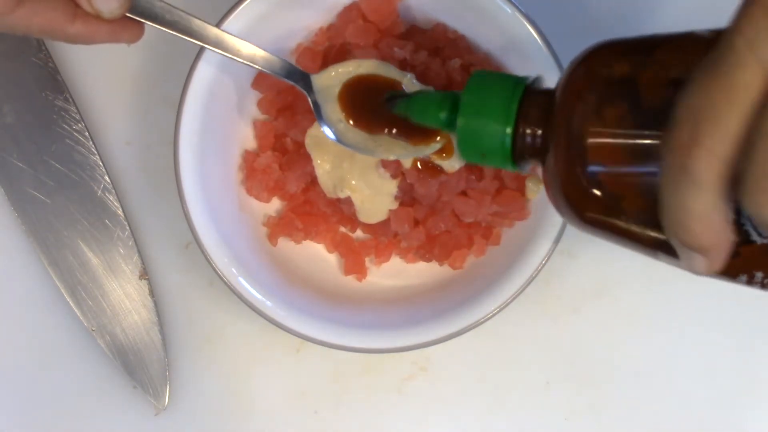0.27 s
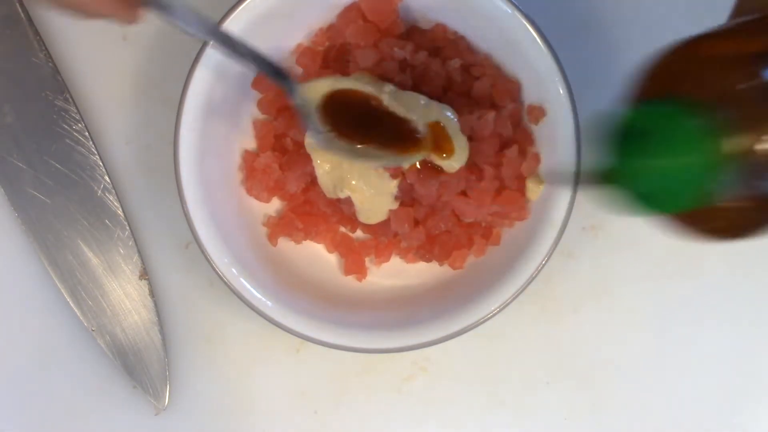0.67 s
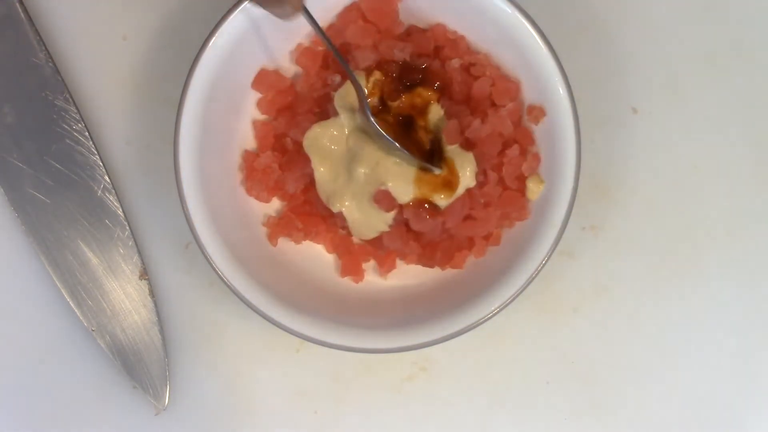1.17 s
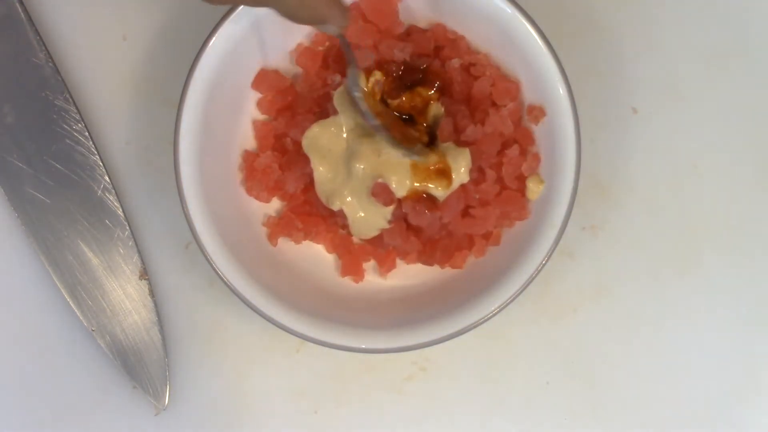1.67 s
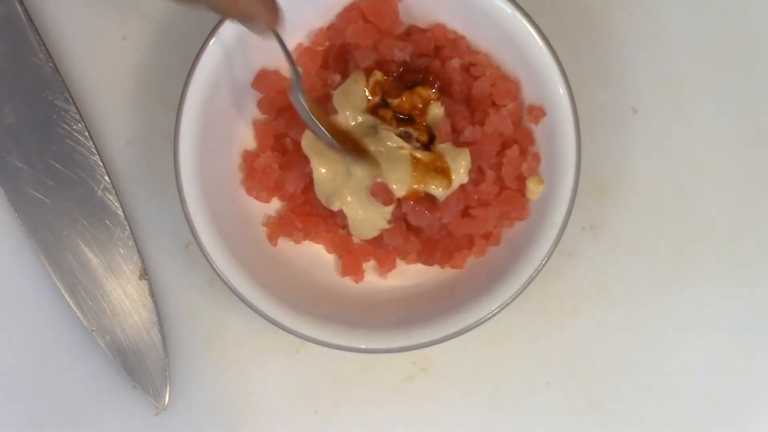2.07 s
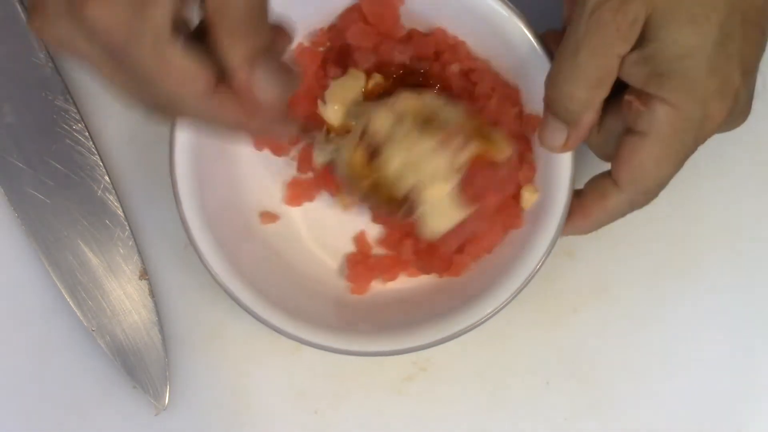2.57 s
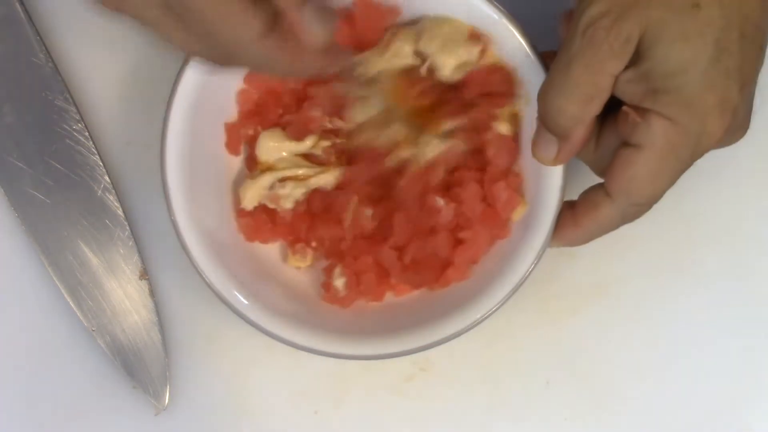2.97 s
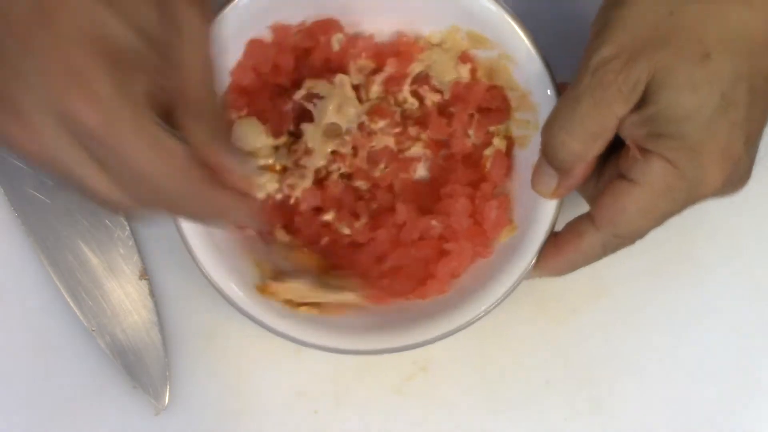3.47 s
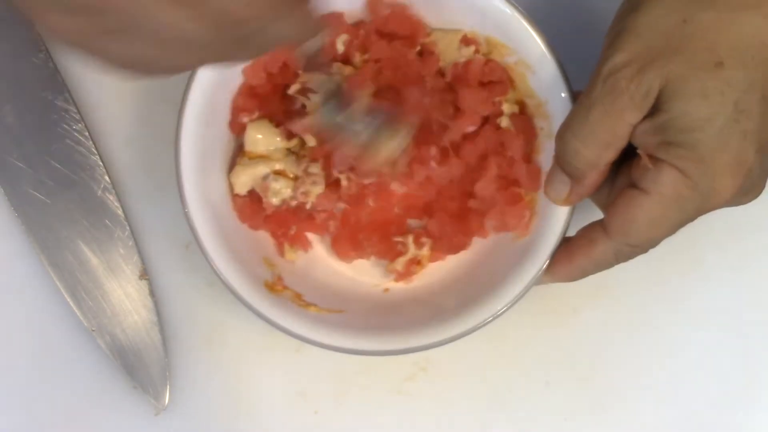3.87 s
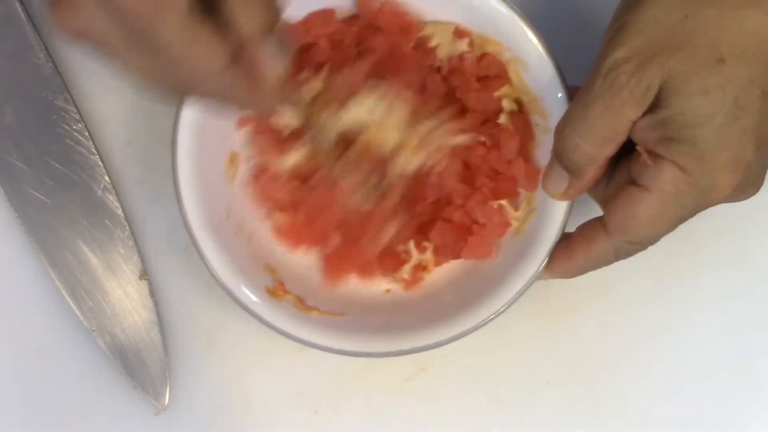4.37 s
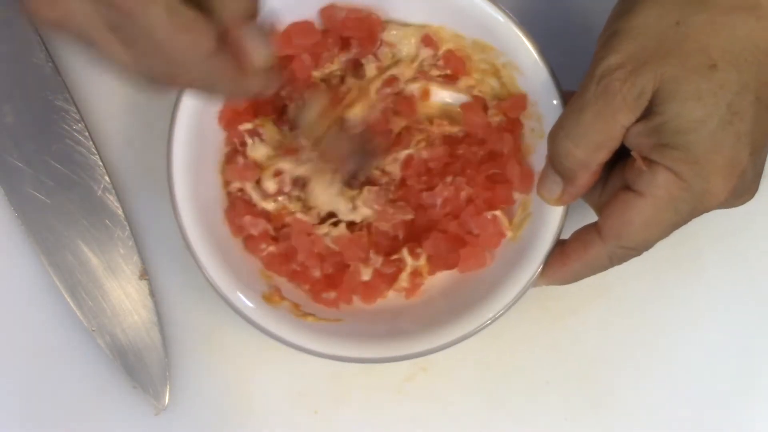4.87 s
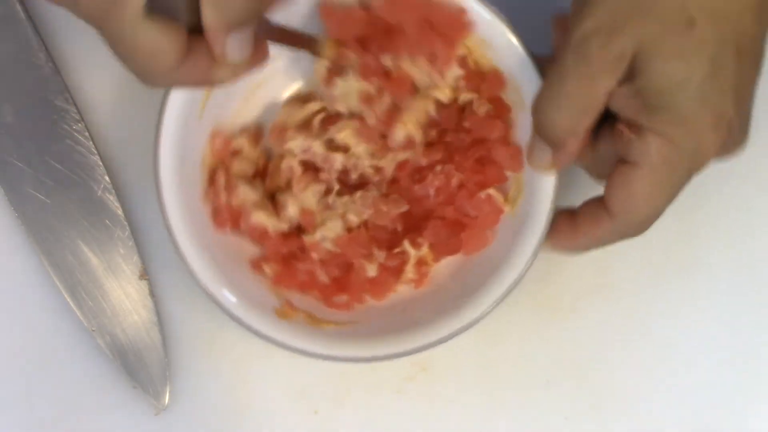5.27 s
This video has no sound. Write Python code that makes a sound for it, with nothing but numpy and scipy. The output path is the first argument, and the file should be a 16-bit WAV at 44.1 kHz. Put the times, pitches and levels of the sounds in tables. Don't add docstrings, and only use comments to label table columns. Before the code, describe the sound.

A steel spoon clinks sharply against a food-filled ceramic bowl in a hard-walled kitchen, with wet stirring, a few bumps and steady appliance hum.

```python
import sys
import numpy as np
from scipy import signal
from scipy.fft import rfft, irfft
from scipy.io import wavfile

SR = 44100
rng = np.random.default_rng(int(sys.argv[2]) if len(sys.argv) > 2 else 0)


def inscribe(sig):
    pcm = np.round(np.clip(np.atleast_2d(sig).T, -1, 1) * 32767)
    wavfile.write(sys.argv[1], SR, pcm.astype(np.int16))


def natural_amplitude(level_db):
    exponent = np.asarray(level_db, float) / 20
    return 10 ** exponent


N = 243873

# [f/Hz, level per Hz/dB]
AIR_NOISE = [(20, -39), (45, -35), (70, -28.5), (100, -25.5), (160, -10), (270, -7), (340, -6),
             (530, -11.5), (900, -18), (2000, -26.5), (3900, -30.5), (7500, -38.5), (11000, -41.5),
             (13500, -47), (16500, -50)]
# [f/Hz, rms level/dB]
MOTOR_TONES = [(247.6, -63.5), (296.1, -60.5), (333.8, -56.5), (436.0, -64.5), (597.5, -73)]
AIR_DB = -46.5
MAINS_HZ, MAINS_DB = 59.3, -72

# [t/s, peak level/dB,
# f/Hz]
SMACKS = [(0.9048, -42, 7520), (1.2805, -38.5, 6300), (2.8592, -32, 6160), (3.595, -29.5, 7900),
          (3.9164, -7, 7450), (3.9168, -12, 9300), (4.1723, -38, 10900), (4.193, -34, 6100),
          (4.2199, -41, 7340), (4.269, -36, 8760), (4.3137, -39, 10300), (4.4087, -34, 10400),
          (4.416, -37.5, 6850), (4.4545, -31, 8910), (4.5006, -26.5, 9700), (4.529, -30, 7160),
          (4.5704, -30, 10500), (4.66, -15, 7590), (4.7337, -27, 10500), (4.816, -31.5, 8140),
          (4.849, -29, 10200), (4.87, -28, 8250), (4.9234, -34, 7900), (4.951, -34, 8920),
          (5.0341, -22, 11100), (5.062, -25.5, 9900), (5.2514, -34.5, 9300), (5.284, -19.5, 8330),
          (5.4518, -32.5, 6860), (5.5152, -27.5, 7180)]
# [t/s, peak level/dB, f/Hz]
TICKS = [(0.1351, -37, 2960), (0.825, -36.5, 3300), (1.514, -42, 1830), (1.8123, -35, 2000),
         (1.8627, -31, 1810), (4.1958, -33, 2280), (4.2267, -34, 2080), (4.2697, -32, 3020),
         (4.424, -31, 3170), (4.4443, -33, 2400), (4.4565, -15, 2120), (4.4721, -28, 2360),
         (4.9485, -30, 3370), (4.999, -29, 1910), (5.1382, -27.5, 3430), (5.2564, -36, 3210),
         (5.2819, -27.5, 4520), (5.459, -37, 2750), (5.5039, -29, 2300)]
# [t/s, level/dB]
STIR_EFFORT = [
    (0, -110),
    (2.5, -74),
    (3.9, -74.5),
    (4.15, -60),
    (4.45, -59.5),
    (4.65, -73),
    (5.05, -58.5),
    (5.38, -78.5),
    (5.53, -58.5),
]
SMACK_CYCLES, TICK_CYCLES = 14, 10
SCRAPE_DB, SQUELCH_DB = 2.5, -2.5
BOWL_ECHO_S, BOWL_ECHO_DB = 0.00087, -7

# [t/s, peak level/dB]
BOTTLE_HITS = [
    (1.632, -21.5),
    (1.651, -28.5),
]
# [f/Hz, level/dB, t60/s]
BOTTLE_MODES = [(121.5, -5, 0.17), (480, -7, 0.07), (612, 0, 0.059), (1280, -8, 0.052), (1977, -0.5, .05)]
# [centre f/Hz, level/dB, half width/octaves, t60/s]
BOTTLE_RATTLE = [(3200, -5, .6, .06), (7000, -19, .7, .04), (560, -11, .6, 0.16)]
BOTTLE_PUSH_CYCLES = .4
# [t/s, peak level/dB, foot f/Hz, foot level/dB, push/ms]
THUDS = [
    (1.881, -23, 406, 14, 1.37),
    (2.222, -5, 456, 3.5, 3.08),
    (3.005, -10, 434, -4.5, 4.8),
]
# [f/Hz, level/dB, t60/s]
BOARD_MODES = [(105.5, -19.5, .2), (164, -25, 0.22), (256.5, -1.5, .1), (298.7, -5, 0.074)]
# [centre f/Hz, level/dB, half width/octaves, t60/s]
THUD_RATTLE = [(400, -8, 1.2, .13)]
FOOT_T60_S, SINK_PUSHES = 0.032, 2.2
# [t/s, peak level/dB]
JOLTS = [
    (2.2255, -3.5),
    (3.0116, -7.5),
]
# [centre f/Hz, level/dB, half width/octaves, t60/s]
JOLT_RATTLE = [(1500, -8, .6, .06), (3100, 1.5, .5, 0.024)]

# [t/s, body peak level/dB, bright edge peak level/dB, edge f/Hz, rim ring level/dB]
CRACKS = [(2.0614, 8, -2.5, 5470, -14.5), (2.3311, -9, -15, 8000, -20.5), (2.6066, -2.5, -27, 6070, -16.5),
          (2.8949, -4.5, -14.5, 6600, -18), (3.1174, 6, -14, 7000, -9.5), (3.392, -11, -18, 5000, -22),
          (3.6518, 5, -4.5, 6400, -13), (3.9168, -8, -10, 6500, -19), (4.661, -4.5, -30, 10000, -16),
          (5.035, -25, -31, 8450, -48), (5.0371, -22.5, -54, 8000, -47)]
BODY_HZ, BODY_OCTAVES, EDGE_OCTAVES = 2750, .62, .8
# [t/s, lower wall f/Hz, its peak level/dB, upper wall f/Hz, its peak level/dB]
CLINKS = [
    (2.0615, 2030, 5, 2950, -8),
    (2.3312, 2147, -5, 3260, -6),
    (2.6067, 2166, -0.5, 3730, -16),
    (2.895, 2250, 0.5, 3010, -4.5),
    (3.1178, 1933, -5, 3370, 0.5),
    (3.392, 2280, -11, 3340, -3),
    (3.6516, 2356, -2.5, 3045, 5),
    (3.9159, 2349, -12, 3551, -3.5),
    (4.661, 2335, -8.5, 3170, -6),
]
# [t/s, peak level/dB, blade f/Hz, tip f/Hz, handle level/dB]
SPOON_RINGS = [
    (2.0615, 14, 4340, 6360, -11.5),
    (2.3311, -5, 4360, 5440, -13.5),
    (2.607, 5.5, 4820, 6040, -14),
    (2.8953, 1, 4300, 6160, -16.5),
    (3.1173, 2, 4790, 6240, 0.5),
    (3.3911, 4.5, 4780, 5550, -19),
    (3.6521, 4.5, 4800, 5530, -17),
    (3.915, 1.0, 4400, 5510, -13),
    (4.6618, -24, 3930, 7600, -0.5),
]
# [f/Hz, level/dB, t60/s]
RIM_MODES = [(566.8, 1, 0.021), (1364, 0.5, 0.024)]
# [f/Hz, level/dB, t60/s]
HANDLE_MODES = [(10500, -3.5, 0.006), (11100, -11, 0.0056), (12600, -9, 0.0031)]
WALL_T60_S, BLADE_T60_S = 0.014, 0.0087

# [f/Hz, t60/s, level/dB]
ROOM_TAIL = [(99.5, 0.45, -10.5), (300, 0.38, 1), (990, 0.6, 3), (2945, 0.58, -9), (7000, 0.57, -2),
             (11000, 0.3195, -4), (15000, 0.21, -12.5)]
# [delay/s, level/dB]
ECHOES = [(.0052, -19.5), (.0090, -22)]
FOOD_ROOM_DB, SIDE_DB = -7, -16

# [f/Hz, left minus right level/dB]
PORT_BALANCE = [(60, -1), (240, -1), (950, -1.5), (3770, -1.5), (15000, 0.5)]
MIC_LOW_HZ, CUTOFF_HZ = 43.5, 16900


def unit_rms(x):
    return x / np.sqrt(np.mean(x ** 2) + 1e-20)


def at_hz(hz, table_hz, values):
    return np.interp(np.log(np.maximum(hz, 1)), np.log(table_hz), values)


def add_mode(out, start_s, hz, db, t60, push_ms=.1):
    start = round(start_s * SR)
    t = np.arange(min(int(1.5 * t60 * SR), N - start)) / SR
    swell = np.sin(np.pi / 2 * np.minimum(t / (push_ms / 1000 + 1e-5), 1)) ** 2
    out[start:start + len(t)] += natural_amplitude(db - 60 * t / t60) * swell * np.sin(2 * np.pi * hz * t)


def resonate(x, hz, width_hz):
    r = np.exp(-np.pi * width_hz / SR)
    feedback = [1, -2 * r * np.cos(2 * np.pi * hz / SR), r * r]
    return signal.lfilter([(1 - r * r) / 2, 0, (r * r - 1) / 2], feedback, x)


def broad_band(x, hz, octaves):
    limits = [hz / 2 ** octaves, min(hz * 2 ** octaves, 19000)]
    sos = signal.butter(2, limits, "band", fs=SR, output="sos")
    return signal.sosfilt(sos, signal.sosfilt(sos, x))


def room_tone():
    white = rng.standard_normal((2, N))
    t = np.arange(N) / SR
    hz = np.fft.rfftfreq(N, 1 / SR)
    air = irfft(rfft(white) * natural_amplitude(at_hz(hz, *np.transpose(AIR_NOISE))), N)
    out = natural_amplitude(AIR_DB - 4.0) * air / air.std(axis=1, keepdims=True)
    for tone_hz, db in MOTOR_TONES:
        width_hz = tone_hz / 60
        wobble = resonate(resonate(white, tone_hz, width_hz), tone_hz, width_hz)
        phase = rng.uniform(0, 5.48, (2, 1))
        steady = np.sqrt(2) * np.sin(2 * np.pi * tone_hz * t + phase)
        out += natural_amplitude(db - 1.0) * (steady + 0.653 * unit_rms(wobble))
    return out + natural_amplitude(MAINS_DB) * np.sqrt(2) * np.sin(2 * np.pi * MAINS_HZ * t)


def food():
    out = np.zeros(N)
    for start_s, db, hz in SMACKS:
        add_mode(out, start_s, hz, db - .6, SMACK_CYCLES / hz, .2)
    for start_s, db, hz in TICKS:
        add_mode(out, start_s, hz, db - .6, TICK_CYCLES / hz, .3)
    out += natural_amplitude(BOWL_ECHO_DB) * np.roll(out, round(BOWL_ECHO_S * SR))

    sizes = natural_amplitude(1.6 * np.minimum(rng.exponential(1, N), 5)) * rng.choice([-1, 1], N)
    draw = rng.random(N)
    rubs = sizes * (draw < 1500 / SR)
    pops = sizes * (draw > 1 - 220 / SR)
    scrape = resonate(rubs, 2300, 350) - 0.28 * resonate(rubs, 3900, 700)

    pitch_number = rng.integers(0, 12, N)
    squelch = np.zeros(N)
    for k, hz in enumerate(np.geomspace(5500, 12000, 12)):
        squelch += resonate(pops * (pitch_number == k) + 1e-18, hz, hz / 9.5)

    effort_db = np.interp(np.arange(N) / SR, *np.transpose(STIR_EFFORT))
    out += natural_amplitude(effort_db + SCRAPE_DB) * unit_rms(scrape)
    return out + natural_amplitude(effort_db + SQUELCH_DB) * unit_rms(squelch)


def add_rattle(out, start_s, hit_db, rattle):
    start, t = round(start_s * SR), np.arange(SR // 8) / SR
    for hz, level_db, octaves, t60 in rattle:
        noise = unit_rms(broad_band(rng.standard_normal(len(t)), hz, octaves))
        fade = natural_amplitude(hit_db + level_db - 4.0 - 60 * t / t60)
        out[start:start + len(t)] += noise * fade * np.minimum(t / 0.0009, 1)


def knocks():
    out = np.zeros(N)
    for start_s, db in BOTTLE_HITS:
        for hz, mode_db, t60 in BOTTLE_MODES:
            add_mode(out, start_s, hz, db + mode_db, t60, 1000 * BOTTLE_PUSH_CYCLES / hz)
        add_rattle(out, start_s, db, BOTTLE_RATTLE)
    for start_s, db, foot_hz, foot_db, push_ms in THUDS:
        add_mode(out, start_s, foot_hz, db + foot_db, FOOT_T60_S, push_ms)
        board_s = start_s + SINK_PUSHES * push_ms / 1000
        for hz, mode_db, t60 in BOARD_MODES:
            add_mode(out, board_s, hz, db + mode_db, t60, push_ms)
        add_rattle(out, start_s, db, THUD_RATTLE)
    for start_s, db in JOLTS:
        add_rattle(out, start_s, db, JOLT_RATTLE)
    return out


def cracks():
    out = np.zeros(N)
    for start_s, body_db, edge_db, edge_hz, _ in CRACKS:
        start = round(start_s * SR)
        bands = (body_db, BODY_HZ, BODY_OCTAVES), (edge_db, edge_hz, EDGE_OCTAVES)
        for db, hz, octaves in bands:
            pulse = broad_band(signal.unit_impulse(1000), hz, octaves)
            out[start:start + len(pulse)] += natural_amplitude(db) * pulse / np.abs(pulse).max()
    return out


def clinks():
    out = np.zeros(N)
    for start_s, low_hz, low_db, high_hz, high_db in CLINKS:
        add_mode(out, start_s, low_hz, low_db, WALL_T60_S, .4)
        add_mode(out, start_s, high_hz, high_db, WALL_T60_S * 0.8, .3)
    for start_s, *_, rim_db in CRACKS:
        for hz, mode_db, t60 in RIM_MODES:
            add_mode(out, start_s, hz, rim_db + mode_db, t60, .6)
    for start_s, db, blade_hz, tip_hz, handle_db in SPOON_RINGS:
        add_mode(out, start_s, blade_hz, db - 10.5, BLADE_T60_S, .2)
        add_mode(out, start_s, tip_hz, db - 6.5, BLADE_T60_S * 0.43, .15)
        for hz, mode_db, t60 in HANDLE_MODES:
            add_mode(out, start_s, hz, db + 3.5 + handle_db + mode_db, t60, .15)
    return out


def kitchen(x, wet_db):
    t = np.arange(SR) / SR
    tail = np.zeros((2, SR))
    edges = 50 * 2 ** np.arange(0, 8.6, .5)
    white = rng.standard_normal((2, 2, SR))
    table_hz, t60, db = np.transpose(ROOM_TAIL)
    for k, (low, high) in enumerate(zip(edges, edges[1:])):
        sos = signal.butter(2, [low, high], "band", fs=SR, output="sos")
        band = signal.sosfilt(sos, white[k % 2])
        hz = np.sqrt(low * high)
        tail += band * natural_amplitude(at_hz(hz, table_hz, db) - 60 * t / at_hz(hz, table_hz, t60))
    build_up = 0.52 + 0.68 * np.sin(np.pi / 2 * np.minimum(t / 0.0093, 1)) ** 2
    tail *= natural_amplitude(wet_db) * build_up * np.minimum(t / 0.0024, 1)
    for delay_s, echo_db in ECHOES:
        tail[:, round(delay_s * SR)] += natural_amplitude(echo_db)
    return signal.fftconvolve(x[None], tail, axes=1)[:, :N]


def scene():
    room, stir, knock, crack, ring = room_tone(), food(), knocks(), cracks(), clinks()
    beamed = kitchen(ring + natural_amplitude(FOOD_ROOM_DB) * stir, wet_db=-38.0)
    spread = kitchen(natural_amplitude(4.5) * crack + knock, wet_db=-35.5)
    mid, side = beamed + spread + room
    close = ring + crack + knock + stir
    return mid + close + natural_amplitude(SIDE_DB) * side * [[1], [-1]]


def low_pass(x):
    return signal.sosfilt(signal.butter(12, 16720, fs=SR, output="sos"), x)


def record(dry):
    hz = np.fft.rfftfreq(N, 1 / SR)
    balance_db = at_hz(hz, *np.transpose(PORT_BALANCE)) * [[.5], [-.5]]
    ports = irfft(rfft(dry) * natural_amplitude(balance_db), N)
    clipped = ports / (1 + np.abs(ports / .8) ** 6) ** (1 / 6)
    low_cut = signal.butter(3, MIC_LOW_HZ, "high", fs=SR, output="sos")
    high_cut = signal.cheby2(12, 60, CUTOFF_HZ, fs=SR, output="sos")
    mix = signal.sosfilt(high_cut, signal.sosfilt(low_cut, clipped))
    return low_pass(mix)


dry = scene()
out = record(dry)
inscribe(out)
```